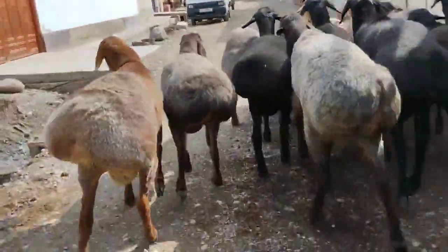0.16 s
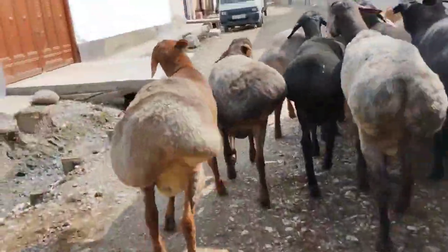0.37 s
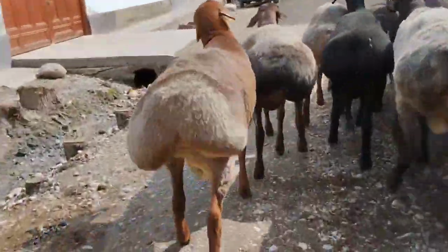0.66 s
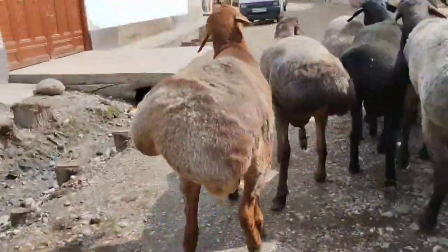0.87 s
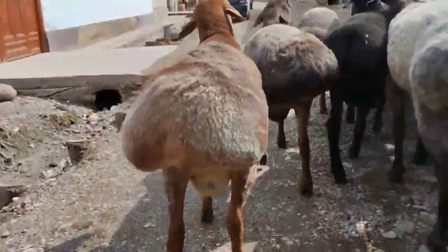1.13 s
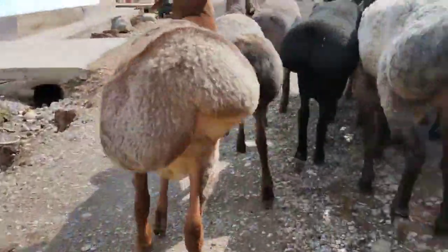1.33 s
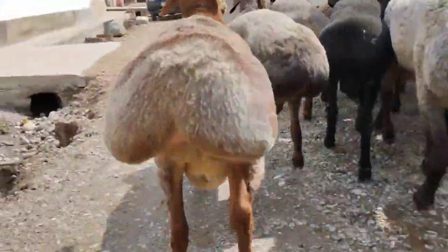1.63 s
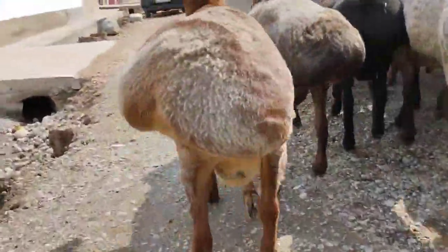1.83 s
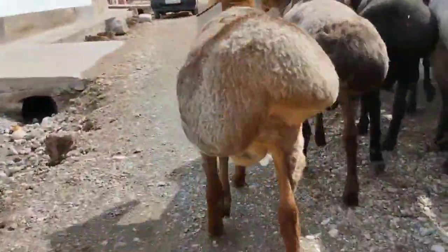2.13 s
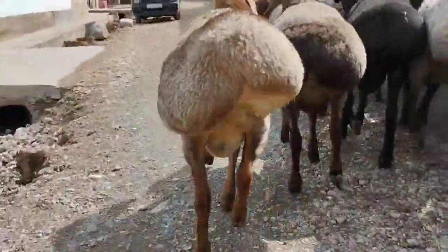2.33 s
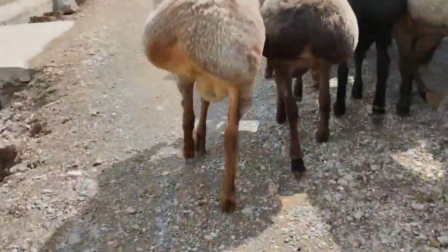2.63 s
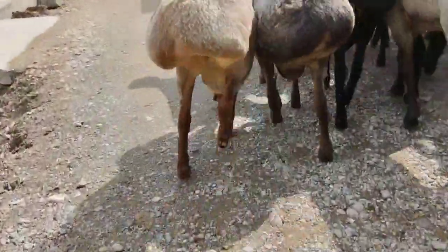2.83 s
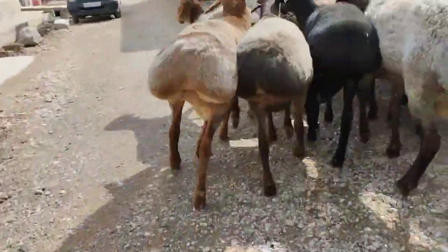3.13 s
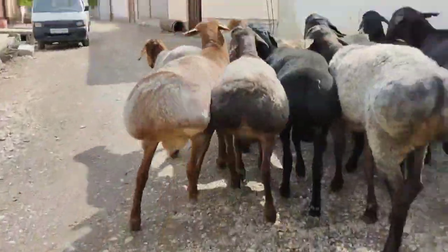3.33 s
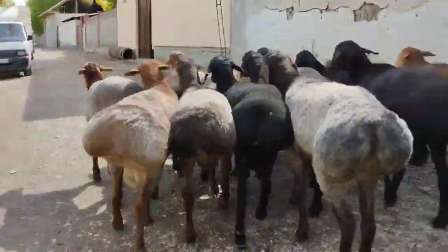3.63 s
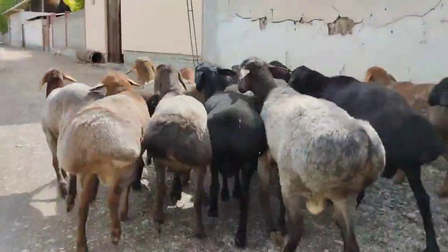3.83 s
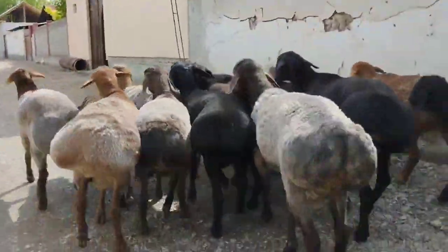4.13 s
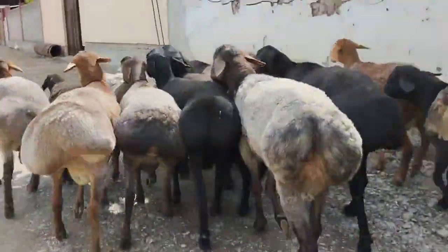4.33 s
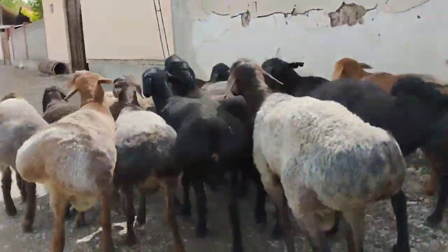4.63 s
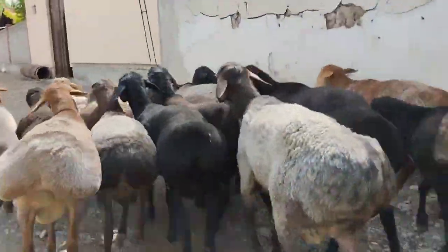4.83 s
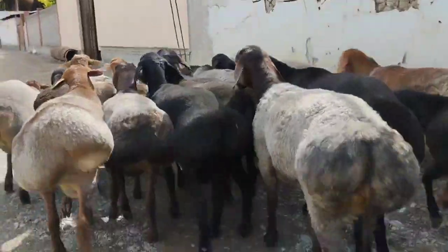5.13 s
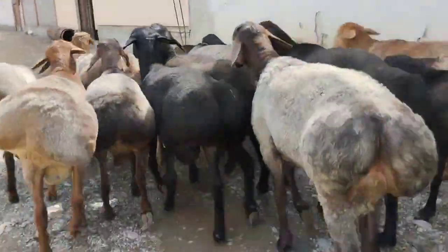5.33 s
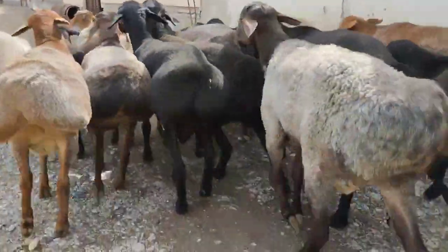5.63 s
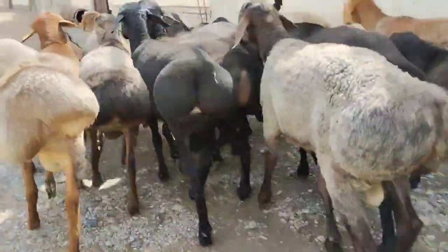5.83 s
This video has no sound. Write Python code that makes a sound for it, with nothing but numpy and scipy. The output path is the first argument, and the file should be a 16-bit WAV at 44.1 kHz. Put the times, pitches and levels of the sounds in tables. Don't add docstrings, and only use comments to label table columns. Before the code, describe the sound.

Close, crisp, dry outdoor recording of a flock's hooves on loose gravel. A continuous irregular patter of grit, drags and pebble knocks carries sharp stone snaps throughout. It begins moderately, with hard pops at the microphone before two seconds, then denser cracking and faint muffled ram grunts around three. A strong snap comes just before four seconds, and crunching continues to the end over slight low rumble and a faint distant hiss.

```python
import sys
import numpy as np
from scipy import signal
from scipy.fft import rfft, irfft, next_fast_len
from scipy.io import wavfile
from scipy.ndimage import uniform_filter1d, map_coordinates

SR = 44100
rng = np.random.default_rng(int(sys.argv[2]) if len(sys.argv) > 2 else 0)


def wav_record(signal):
    frames = np.transpose(np.atleast_2d(signal))
    bounded = np.clip(frames, -1, 1)
    quanta = np.round(bounded * 32767).astype(np.int16)
    wavfile.write(sys.argv[1], SR, quanta)


def rack_gain(trim_db):
    fader = np.asarray(trim_db, float)
    return 10 ** (fader / 20)


N = 264159


def unit(x):
    return x / np.sqrt(np.mean(x ** 2) + 1e-20)


def curves(rows):
    s, *cols = np.transpose(rows)
    return [np.interp(np.arange(N) / SR, s, c) for c in cols]


def wobble(rate):
    knots = rng.standard_normal(int(N * 200 / SR) + 4)
    return map_coordinates(knots, [np.arange(N) * min(rate, 200) / SR])


def gain(points, hz):
    f, v = np.transpose(points)
    return rack_gain(np.interp(np.log(hz + 1), np.log(f + 1), v))


def filtered(x, response):
    m = next_fast_len(x.shape[-1] + 4096)
    spectrum = rfft(x, m) * response(np.fft.rfftfreq(m, 1 / SR))
    return irfft(spectrum, m)[..., :x.shape[-1]]


def coloured(x, spectrum):
    return unit(filtered(x, lambda f: gain(spectrum, f)))


def resonance(f, hz, width):
    return 1j * f * width / (hz * hz - f * f + 1j * f * width)


def placed(times, shapes):
    at = np.round(np.asarray(times) * SR).astype(int)[:, None] + np.arange(shapes.shape[1])
    return np.bincount(np.clip(at, 0, N).ravel(), shapes.ravel(), N + 1)[:N]


def swells(rows):
    t = np.arange(N) / SR
    rise = 0.46
    return sum(db * np.interp(t, [s - rise * abs(length), s, s + (1 - rise) * abs(length)], [0, 1, 0])
               for s, db, length in rows)


def ticks(count, spread_db, t60):
    chance, size = rng.random((2, N))
    starts = (chance < count / SR) * rack_gain(-spread_db * np.log(size + 1e-3))
    return unit(signal.lfilter([1], [1, -rack_gain(-60 / (abs(t60) * SR))], starts))


def crunch(contacts, clump_db, clump_rate, patchy_db):
    grains = rng.standard_normal(N) * contacts * rack_gain(clump_db * wobble(clump_rate))
    z = signal.stft(grains, nperseg=128)[2]
    field = uniform_filter1d(rng.standard_normal(z.shape), size=7, axis=0)
    field = uniform_filter1d(field, size=5, axis=1)
    return signal.istft(z * rack_gain(patchy_db * unit(field)), nperseg=128)[1][:N]


# start_s, tread_db, nearness_db
FLOCK_LEVELS = [(0, -45.5, -10), (.6, -42, -43), (1.0, -42, -17), (1.45, -39.5, -14), (1.95, -39, -2),
                (2.3, -38, -8), (2.55, -36.5, -1), (2.8, -38.5, -7), (3.05, -35, -9), (3.5, -41, -11),
                (3.9, -34, -21), (4.25, -37.5, -5), (4.6, -39.5, -20), (5.0, -37.5, -9), (5.4, -37.5, -9),
                (5.7, -37.5, -14), (5.99, -37.5, -12)]
# peak_s, swell_db, length_s
STEPS = [(.05, 10.5, 0.12), (.25, 8, 0.062), (.5, 9.5, 0.08), (.545, 5, 0.18), (.88, -5, 0.13),
         (1.12, 6.5, 0.19), (1.3, 5.5, 0.059), (1.57, 1, 0.41), (1.82, 11.5, 0.093), (2.02, 9, 0.049),
         (2.27, 3.5, 0.45), (2.45, 12, 0.097), (2.54, 4.5, 0.1), (2.92, -2.5, 0.37), (3.08, 3.5, 0.14),
         (3.385, 9, 0.12), (3.545, 9, 0.039), (3.69, 3, 0.18), (4.07, -2, 0.34), (4.36, 5.5, 0.063),
         (4.69, 8.5, 0.12), (4.84, 5.5, .07), (4.92, 5.5, 0.072), (5.19, 8.5, 0.12), (5.64, 4.5, 0.39),
         (5.84, 4.5, 0.22), (5.94, 8.5, 0.034)]
# peak_s, swell_db, length_s
DRAGS = [(0, 14, 0.12), (.15, 16.5, 0.28), (.55, 9, 0.12), (.63, 12, 0.26), (.88, 11, 0.16),
         (1.13, 12, 0.19), (1.3, 3.5, 0.51), (1.57, 10.5, 0.16), (1.665, 10, 0.032), (2.08, 6, 0.15),
         (2.52, 11.5, 0.08), (2.65, 9.5, 0.23), (3.08, 8, 0.14), (3.38, 3.5, 0.2), (3.7, 5, 0.2),
         (4.19, 3, 0.1), (4.69, 3.5, 0.23), (5.19, 7, 0.15), (5.65, 15, 0.24)]
# deepest_s, fall_db, length_s
LULLS = [(.79, 4.5, 0.11), (1.423, 6.5, 0.12), (1.75, 11.5, 0.31), (2.35, 5, 0.15), (2.975, 10, 0.021),
         (3.03, 7, 0.03), (3.335, 5, 0.12), (1.705, 1, 0.036), (3.73, 6, 0.041), (3.83, 8, 0.024),
         (5.745, 1.5, 0.071), (3.97, 5, 0.059), (4.34, 6, 0.085), (4.79, 6.5, 0.058), (4.87, 3.5, 0.088),
         (5.59, 3.5, 0.1), (5.91, 7.5, 0.073)]


def footfall():
    tread_db, near_db = curves(FLOCK_LEVELS)
    steps, lulls, drags = swells(STEPS), swells(LULLS), swells(DRAGS)
    grit_db = tread_db + steps - lulls
    dull_db = tread_db - 12.5 + 0.36 * steps - 0.99 * lulls
    scuff_db = dull_db + 0.55 * drags
    dust_db = tread_db + near_db + 0.55 * steps - lulls
    return grit_db, scuff_db, dull_db + drags, dust_db


# pitch_hz, level_db
GRIT = [(880, -16.5), (1500, -18.5), (2330, -12.5), (3910, -9.5), (4940, -10.5), (6240, 1), (7560, 0.5),
        (11000, -7.5), (14300, -14.5), (17000, -25)]
# pitch_hz, level_db
SCUFF = [(120, -71), (200, 4.5), (318, -7.5), (446, 3), (666, -9.5), (1640, -3.5), (4000, 2.5),
         (6000, -9.5), (8800, -120)]
# pitch_hz, level_db
RUMBLE = [(8.8, 5.5), (15, -8), (37, -3), (140, -10), (177, -10.5), (300, -25.5), (390, -50), (660, -120)]
# pitch_hz, level_db
DUST = [(9000, -50), (11000, -24), (15500, -4), (16100, -56)]
# peak_s, swell_db, length_s
SHAKES = [
    (.22, 6, 0.25),
    (1.3, 5, .2),
    (1.85, -5.5, 0.37),
    (2.22, 7.5, 0.32),
    (2.75, -2, 0.76),
    (4.7, 6, .15),
]


def tread():
    grit_db, scuff_db, drag_db, dust_db = footfall()
    shared = rack_gain(0.79 * wobble(30))
    near = ticks(count=160, spread_db=1.0, t60=0.026)
    blur = ticks(count=1500, spread_db=2.5, t60=0.014)
    fine = crunch(0.94 + 0.2 * blur + 1.06 * near, clump_db=-2.0, clump_rate=22, patchy_db=2.0)
    grit = rack_gain(grit_db - 2.1) * coloured(fine, GRIT) + rack_gain(dust_db - 17.0) * coloured(fine, DUST)
    spits = crunch(ticks(count=110, spread_db=1.5, t60=0.0021), clump_db=-2.5, clump_rate=10, patchy_db=4.0)
    grit += rack_gain(grit_db - 13) * coloured(spits, GRIT) + rack_gain(dust_db - 14) * coloured(spits, DUST)
    dull = crunch(1.8 + 0.4 * near, clump_db=1.5, clump_rate=36, patchy_db=4.5)
    scuffing = rack_gain(scuff_db - 0.5) * coloured(dull, SCUFF)
    rolling = crunch(ticks(count=400, spread_db=2.5, t60=0.02), clump_db=-1.5, clump_rate=48, patchy_db=2.5)
    hollow = unit(filtered(rolling, lambda f: resonance(f, 987, 1540) ** 2))
    dragged = rack_gain(1.3 * (drag_db + 44.0) - 48.5) * hollow
    shaking = crunch(1, clump_db=1.1, clump_rate=2.4, patchy_db=3.0)
    rumble = rack_gain(swells(SHAKES) - 52.0) * coloured(shaking, RUMBLE)
    return shared * (grit + scuffing + dragged) + rumble


def steady_hiss():
    return rack_gain(-70) * unit(filtered(rng.standard_normal(N), lambda f: resonance(f, 15000, 12000) ** 2))


def knocks(kinds):
    rows = [(*row, cycles) for table, cycles in kinds for row in table]
    s, db, hz, cycles = np.transpose(rows)[:, :, None]
    turns = hz * np.arange(SR // 50) / SR
    u = turns / np.abs(cycles)
    shape = np.sin(2 * np.pi * (turns + rng.random(s.shape))) * 7 * u * np.exp(1 - 4.43 * u)
    return placed(s[:, 0] + 0.000785, rack_gain(db - 5.0) * shape)


# start_s, peak_db, pitch_hz
TAPS = [(.002, -26, 1110), (.147, -23.5, 1150), (.187, -45, 1290), (.2, -26, 2170), (.577, -37, 1350),
        (.612, -27.5, 794), (.887, -35.5, 835), (1.066, -40, 1000), (1.098, -32, 1030),
        (1.118, -19.5, 1240), (1.142, -33, 1020), (.056, -40, 237), (2.44, -31, 1880), (2.511, -34, 1330),
        (2.633, -27, 1400), (2.907, -32, 2230), (2.985, -35.5, 456), (3.071, -24, 3500), (3.096, -43, 1230),
        (3.104, -22.5, 1330), (3.363, -33, 1220), (3.689, -39, 1240), (3.279, -23, 3520),
        (4.188, -26.5, 2420), (4.556, -25, 3920), (4.586, -23.5, 3300), (5.68, -37, 950)]
# start_s, peak_db, pitch_hz
MORE_TAPS = [(0.0079, -27, 1060), (0.1892, -38, 1350), (0.5497, -39, 980), (0.8077, -38, 950),
             (0.8939, -33, 726), (1.1436, -32, 1060), (1.232, -37.5, 880), (1.5679, -46, 1340),
             (1.579, -42, 1280), (1.9434, -33, 1300), (2.0262, -41, 580), (2.2102, -35.5, 610),
             (2.2665, -37, 750), (2.4195, -37, 1080), (2.4467, -25, 1860), (2.493, -36, 1170),
             (2.5439, -35, 850), (2.6062, -40, 760), (2.7207, -39, 700), (2.7979, -42, 730),
             (2.9238, -30, 1520), (2.9912, -38, 1210), (3.0625, -28, 1740), (3.0951, -27, 1300),
             (3.1173, -38, 1280), (3.6057, -38, 760), (3.6219, -38, 1230), (3.7037, -31, 1310),
             (3.8572, -29.5, 1850), (3.9327, -33, 1280), (4.0535, -34, 1150), (4.2699, -33, 1830),
             (4.826, -34, 1520), (5.0202, -37.5, 740), (5.2135, -35, 1850), (5.2404, -29, 1710),
             (5.3199, -39, 1140), (5.5194, -41, 530), (5.612, -36, 1030), (5.6365, -27.5, 570),
             (5.7065, -31, 1040), (5.9705, -35, 1840)]
# start_s, peak_db, pitch_hz
CLINKS = [(0.0375, -28.0, 4130), (0.1176, -24.5, 4240), (0.5307, -30, 3790), (1.308, -34, 3820),
          (1.7982, -28, 3940), (2.5746, -25, 4180), (2.6521, -39, 2160), (2.7232, -26.5, 4340),
          (2.9244, -28.5, 4030), (3.0968, -24, 4200), (3.7975, -32.5, 2930), (3.8557, -31, 3760),
          (4.007, -29.0, 3780), (4.0543, -29, 3780), (4.2674, -33, 4170), (4.2799, -29, 3670),
          (4.3586, -36, 3460), (4.3892, -24.5, 3900), (5.1842, -29, 4920), (5.6345, -28, 4250),
          (5.6639, -25, 4660), (5.9517, -31, 4930)]
# start_s, peak_db, pitch_hz
THUDS = [(.055, -32.5, 470), (.66, -23, 1010), (1.47, -32.5, 1520), (2.071, -34, 423), (2.373, -23, 2050),
         (4.471, -30, 740), (4.511, -26, 735), (5.173, -22, 1240), (5.623, -37, 1153)]
# start_s, peak_db, pitch_hz
CLACKS = [(.141, -23.5, 1430), (.428, -34, 1200), (.531, -33, 1630), (1.1068, -26, 990),
          (1.151, -19.5, 1190), (1.182, -21, 1150), (2.665, -25, 1430), (3.05, -27, 1670),
          (3.7378, -35, 1400), (4.702, -21, 1960), (5.223, -25, 1510), (5.248, -27, 1470)]
# start_s, peak_db, pitch_hz
PINGS = [
    (.49, -30, 10100),
    (.513, -40, 10100),
    (1.974, -30, 13600),
    (2.122, -34, 13550),
    (2.141, -32, 13500),
    (2.242, -28, 13200),
]


def pebbles():
    return knocks([(TAPS, 2.17), (MORE_TAPS, 2.17), (CLINKS, 6.8), (THUDS, 1.46), (CLACKS, 3.75), (PINGS, 130)])


def snaps(stones):
    s, db, hz, t60, top_db, low_db = np.transpose(stones)[:, :, None]
    lead = SR // 50
    t = (np.arange(SR // 8) - lead) / SR
    noise = rng.standard_normal((len(s), len(t)))
    sizes = rng.exponential(size=(len(s), len(t) // 16 + 1)).repeat(16, axis=1)[:, :len(t)]
    chips = rack_gain(5.04 * np.minimum(sizes, 2.8) - 5.5)
    loading = 0.18 * chips * rack_gain(60 * t / 0.016)
    settling = 0.5 * chips * rack_gain(-60 * t / np.abs(t60))
    crack = noise * (t >= 0) * rack_gain(-60 * np.abs(t) / 0.0026)
    burst = crack + noise * np.where(t < 0, loading, settling)

    def body(f):
        ring = gain(GRIT, f) * (1 + 3.62 * resonance(f, hz, 0.21 * hz))
        return ring + rack_gain(low_db + 14.5) * resonance(f, 3580, 1310)

    edge = filtered(crack + 0.19 * burst, lambda f: resonance(f, 14500, 9000) ** 2)
    rung = filtered(burst, body) + rack_gain(top_db + 21.5) * edge
    rung /= np.abs(rung).max(axis=1, keepdims=True)
    return placed(s[:, 0] - lead / SR, rack_gain(db - 0.67) * rung)


# start_s, peak_db, ring_hz, t60_s
THIN = [(0.0197, -20.5, 6180, 0.019), (0.038, -17, 8160, 0.012), (4.378, -13, 8700, 0.065),
        (0.8884, -19, 6040, 0.071), (1.348, -18.5, 7240, 0.064), (1.548, -17.5, 6900, .04),
        (1.572, -14.5, 7500, 0.015), (1.6785, -17, 8000, 0.0088), (1.7879, -20.5, 8400, 0.05),
        (2.1282, -18.5, 6200, 0.11), (2.512, -11, 4760, 0.18), (2.5695, -12.5, 8240, 0.039),
        (2.5834, -7, 6560, 0.0099), (2.607, -4, 6450, 0.011), (2.639, -13, 8650, 0.055),
        (4.082, -8.5, 8350, 0.057), (2.7978, -23, 5700, 0.028), (3.2128, -22, 8860, 0.017),
        (4.059, -11.5, 8100, 0.024), (4.3893, -10.5, 8800, 0.024), (4.6558, -20.5, 6550, 0.065),
        (4.7273, -22, 8310, 0.048), (5.1853, -17.5, 6460, 0.098), (5.199, -11, 6300, 0.067),
        (5.2805, -17.5, 6300, 0.1), (5.3058, -7, 8840, 0.029), (5.4816, -18, 6900, 0.06),
        (1.6202, -16.5, 8400, 0.012), (5.7677, -10, 8650, 0.027), (5.952, -12.5, 5230, 0.018)]
# start_s, peak_db, ring_hz, t60_s
FULL = [(.14, -13.5, 7900, 0.05), (0.429, -19, 6260, 0.094), (.842, -18, 5450, 0.065),
        (1.6776, -4, 11700, 0.015), (1.469, -16.5, 7800, 0.051), (1.921, -21.5, 6600, 0.23),
        (2.4494, -9, 6900, 0.016), (3.078, -9, 6500, 0.018), (3.111, -11, 8330, 0.018),
        (3.1436, -13, 7850, 0.19), (3.2525, -19, 6160, 0.1), (3.447, -18.5, 5800, 0.13),
        (3.687, -21, 7740, 0.15), (3.1596, -15.5, 6500, .04), (3.7663, -18, 7350, 0.11),
        (4.076, -12.5, 8250, 0.1), (4.1879, -20, 9050, 0.11), (4.367, -15.5, 8760, 0.15),
        (4.7708, -17, 6540, 0.02), (4.822, -22, 6160, 0.076), (4.8956, -16, 7300, 0.15),
        (4.978, -19, 9100, 0.073), (5.034, -13, 9050, 0.071), (5.1026, -9, 7260, 0.061),
        (5.1533, -18, 7350, 0.046), (5.381, -19.5, 8400, 0.043), (5.4088, -14.5, 6000, 0.057),
        (5.556, -20.5, 8800, 0.043), (5.5977, -9.5, 8600, 0.021), (5.6, -8.5, 8500, 0.038)]
# start_s, peak_db, ring_hz, t60_s, edge_db
SHARP = [(.286, -16.5, 8650, 0.024, -13.5), (0.865, -16, 7440, 0.041, -13), (1.5315, -24, 7220, 0.032, -17),
         (1.5894, -8.5, 7800, 0.033, -13), (1.65, -24, 7620, 0.051, -17), (1.884, -14.5, 8300, 0.057, -19),
         (1.9754, -36, 13700, .075, 5), (2.0114, -4.5, 7700, 0.078, -7), (2.0702, -12.5, 5700, 0.061, -22),
         (2.1966, -18, 8500, .015, -3), (2.2308, -19, 6300, 0.088, -11), (2.2921, -15, 11000, 0.029, -13),
         (2.382, -11, 9450, 0.1, -13.5), (2.4106, -6.5, 7100, 0.037, -6.5),
         (2.9087, -14.5, 9400, 0.14, -14), (2.9864, -20, 6400, 0.073, -13), (3.052, -17.5, 6800, .04, -17),
         (3.3682, -14, 8350, 0.043, -15), (3.614, -16, 6320, 0.075, -11), (3.925, -0.5, 8200, 0.036, -9),
         (4.3083, -15.5, 7260, .043, 11), (4.511, -12.5, 8000, 0.045, -13), (5.3638, -25, 7300, 0.04, -18),
         (5.9302, -7.5, 9150, 0.044, -22)]


def stones():
    thin = [(*row, -37, -33) for row in THIN]
    full = [(*row, -44, -11) for row in FULL]
    sharp = [(*row, -22.5) for row in SHARP]
    return snaps(thin + full + sharp)


def walls(x):
    t = np.arange(SR // 4) / SR
    tail = rng.standard_normal(len(t)) * rack_gain(-60 * t / 0.027) * (t > .004)
    return signal.fftconvolve(x, tail / np.linalg.norm(tail))[:N]


# start_s, peak_db, ring_hz
CHIPS = [(0.366, -23, 6700), (.487, -32, 7550), (0.51, -28, 6310), (.5658, -24.5, 6550),
         (0.6455, -20.5, 8040), (0.977, -22, 6260), (1.286, -23.5, 6850), (1.307, -22, 8180),
         (1.5083, -21, 6800), (1.5415, -21, 8150), (1.608, -25, 6510), (1.8002, -19, 8660),
         (2.0041, -15, 7350), (2.043, -17, 6630), (2.1703, -21, 7520), (2.197, -17, 8140),
         (2.2035, -28, 7720), (2.2123, -28, 7720), (2.249, -20, 6920), (2.272, -29, 7570),
         (2.299, -23.5, 11280), (2.4454, -23, 7140), (2.475, -23, 7290), (2.504, -18.5, 6410),
         (2.5985, -19, 8910), (2.6645, -23, 7210), (2.695, -19, 6640), (2.7977, -27, 6470),
         (2.8527, -19, 6540), (2.875, -24, 8000), (3.0041, -29, 8310), (3.1225, -18, 7450),
         (3.5228, -21, 6800), (4, -23, 7570), (4.0538, -15, 7890), (4.1153, -17, 7800), (4.42, -25, 6740),
         (4.49, -20.5, 6310), (4.5352, -22, 7520), (4.7607, -21, 6510), (5.0228, -18, 9560),
         (5.3274, -26.5, 6310), (5.4198, -20, 8650), (5.5146, -13.5, 6500), (5.525, -15, 6100),
         (5.662, -29, 8800), (5.8375, -21, 6630), (5.8556, -22, 6020)]
# start_s, peak_db, ring_hz, t60_s
MORE_CHIPS = [
    (0.493, -29, 10000, .02),
    (0.67, -22, 6660, 0.017),
    (2.648, -14.5, 8500, .03),
    (4.079, -12, 8610, .012),
    (5.208, -13.5, 9200, .015),
    (5.394, -21, 9500, .015),
]


def small_chips():
    edge_db, body_db, chip_t60 = -34, -28, 0.017
    chips = [(*row, chip_t60, edge_db, body_db) for row in CHIPS]
    return snaps(chips + [(*row, edge_db, body_db) for row in MORE_CHIPS])


# start_s, peak_db
SPLINTERS = [(1.1159, -38), (1.5414, -28.0), (1.8788, -22.5), (1.9763, -30), (2.004, -21), (2.076, -20.5),
             (2.2042, -21.5), (2.2996, -22.5), (2.4554, -22), (2.5052, -26), (2.5245, -23), (2.5301, -25.0),
             (2.5975, -23), (2.6074, -20), (2.8557, -31), (2.9897, -27), (3.0039, -30.0), (3.0776, -25),
             (3.1495, -26.0), (3.2134, -25.5), (3.7707, -27), (3.856, -24), (4.0797, -27), (4.1125, -29),
             (4.3755, -22.5), (5.2106, -24), (5.3273, -33), (5.4194, -26), (5.5069, -27), (5.849, -30),
             (5.8554, -26), (5.9344, -28)]


def splinters():
    s, db = np.transpose(SPLINTERS)[:, :, None]
    t = np.arange(SR // 100) / SR
    noise = rng.standard_normal((len(s), len(t))) * rack_gain(-60 * t / 0.0069)
    tick = filtered(noise, lambda f: resonance(f, 10800, 7000) ** 2)
    return placed(s[:, 0], rack_gain(db + 4.5) * tick / np.abs(tick).max(axis=1, keepdims=True))


# start_s, length_s, pitch_hz, peak_db
GRUNTS = [
    (1.382, 0.14, 92.7, -59),
    (2.606, 0.4, 90.2, -44.5),
    (3.12, .16, 89, -42.5),
]
# pitch_hz, width_hz, level_db
THROAT = [(207, 100, -2), (342, 52, 3), (684, 115, 2), (890, 16, 2)]


def grunts():
    onset_s, fade_db_per_s, close_s, silent_db = 0.032, 73, 0.066, -35
    points = []
    for s, length, pitch, peak in GRUNTS:
        faded = peak - fade_db_per_s * (length - onset_s)
        points += [(s, pitch, peak + silent_db), (s + onset_s, pitch, peak),
                   (s + length, pitch, faded), (s + length + close_s, pitch, peak + silent_db)]
    hz, db = curves(points)
    cycles = np.cumsum(hz * (1 + 0.0201 * wobble(60))) / SR
    pulses = np.diff(np.floor(cycles), prepend=0) * rack_gain(1.5 * wobble(80))
    breath = .02 * rng.standard_normal(N)

    def muffled(f):
        throat = sum((-1) ** k * rack_gain(d) * resonance(f, c, w) for k, (c, w, d) in enumerate(THROAT))
        return throat / (1 + (f / 1100) ** 4)

    return rack_gain(db) * unit(filtered(pulses + breath, muffled))


# start_s, peak_db, push_s, rebound_hz, rebound_t60_s
BUMPS = [
    (1.5956, -10, 0.000032, 2400, 0.0066),
    (1.5957, -2, 0.000024, 7000, 0.0021),
    (1.5968, -8.5, 0.00069, 526, 0.014),
    (1.677, -8.5, 0.00017, 1520, 0.009),
    (1.683, -9, 0.00028, 1300, 0.003),
    (1.6843, 0.5, 0.0003, 193, 0.0086),
    (1.6844, 2, 0.00002, 10500, 0.002),
    (3.7386, -10.5, 0.000095, 1400, 0.0061),
    (5.6824, -2, 0.000051, 3930, 0.0019),
]


def bumps():
    s, db, push, hz, t60 = np.transpose(BUMPS)[:, :, None]
    t = np.arange(SR // 20) / SR
    u = t / push
    swing = np.sin(2 * np.pi * hz * np.maximum(t - push, 0)) * rack_gain(-60 * t / t60)
    blows = placed(s[:, 0], rack_gain(db) * (6 * u * np.exp(-2.5 * u) - 0.58 * swing))
    return filtered(blows, lambda f: (1j * f / (80 + 1j * f)) ** 2 / (1 + (f / 12000) ** 4))


def scene():
    near = stones() + grunts()
    echo = rack_gain(-15) * walls(near)
    ground = tread() + steady_hiss()
    small = pebbles() + small_chips() + splinters()
    return (near + echo + ground + small + bumps())[None]


SUDDEN = [.286, 1.59, 1.678, 1.684, 1.884, 1.976, 2.012, 3.925, 4.309, 5.023, 5.102, 5.281, 5.306, 5.599]


def top_band(dry):
    slope_hz = 100
    top = filtered(dry, lambda f: np.clip((f - 15860) / slope_hz + .5, 0, 1))
    openings = np.tile(np.hanning(SR // 250), (len(SUDDEN), 1))
    kept = np.clip(placed(np.array(SUDDEN) - .0015, openings), 0, 1)
    return filtered(dry - (1 - kept) * top, lambda f: np.clip((16850 - f) / slope_hz, 0, 1))


def top_cut(x):
    return signal.sosfilt(signal.butter(12, 16820, fs=SR, output="sos"), x)


def record(dry):
    return top_cut(top_band(dry))


dry = scene()
out = record(dry)
wav_record(out)
```